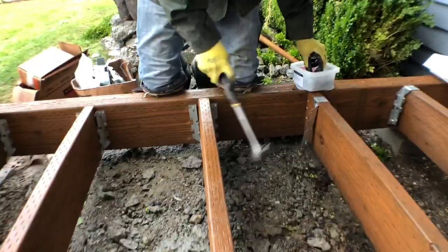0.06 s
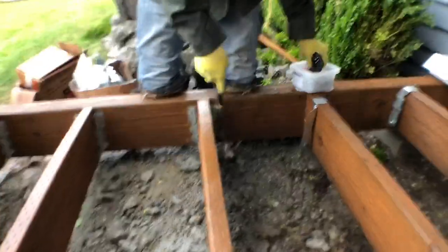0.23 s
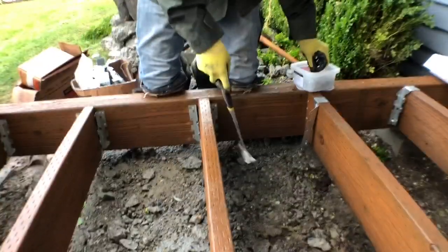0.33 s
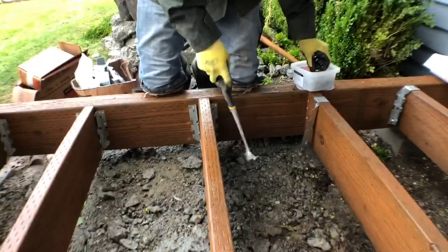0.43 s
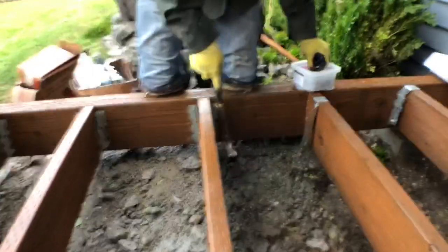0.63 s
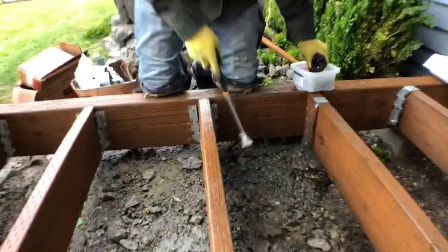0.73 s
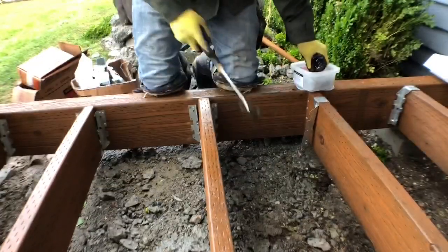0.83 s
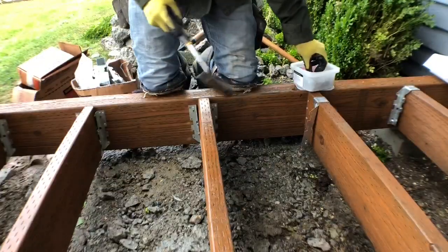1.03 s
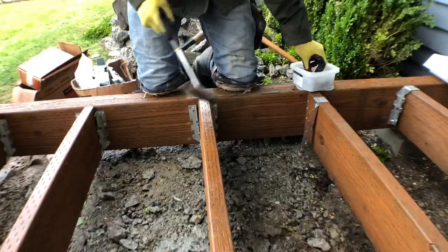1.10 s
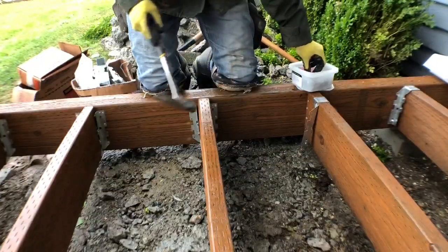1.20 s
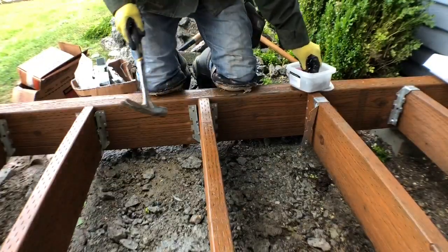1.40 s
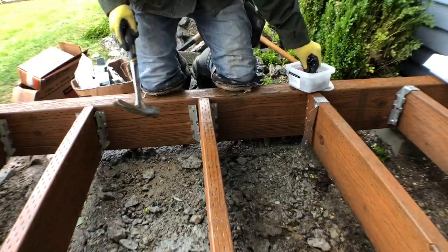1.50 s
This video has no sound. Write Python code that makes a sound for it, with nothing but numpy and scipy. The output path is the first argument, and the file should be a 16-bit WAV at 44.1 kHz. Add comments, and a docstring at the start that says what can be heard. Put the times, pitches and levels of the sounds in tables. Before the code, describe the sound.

A hammer hits a nail through a steel bracket into timber joists, outdoors and close. Soft glove rustle and tiny nail ticks open; at 0.23 s a sharp bright crack with woody resonance and brief scattered hiss; at 0.64 s a second, with fuller, duller boom and thumps. Faint low hums follow near 0.85 s, then nails tick, ping and scrape in a plastic tub from 1.13 to 1.55 s over quiet air.

```python
"""A hammer strikes a nail twice through a steel bracket into an outdoor timber frame. Each blow is a sharp crack
of shaped noise, a boom of noise-driven joist tones, and a swelling hiss that the yard sends back.
Thumps and hums follow in the joists. Loose nails in a plastic tub tick (noise bursts and hollow knocks) and
ping (beating tone pairs), gloves rustle in grains of noise and drag along the tub, over quiet noise for air."""
import sys
import numpy as np
from scipy import signal
from scipy.fft import rfft, irfft
from scipy.io import wavfile

SR = 44100
rng = np.random.default_rng(int(sys.argv[2]) if len(sys.argv) > 2 else 0)


def volts_from_db(level):
    """Convert decibel levels to linear amplitude ratios."""
    exponent = np.asarray(level, float) / 20
    return 10 ** exponent


def unload_wav(signal):
    """Save mono or channel-first audio to the path in sys.argv[1] as 16-bit WAV at rate SR, clipped to [-1, 1]."""
    wavfile.write(
        sys.argv[1],
        SR,
        np.round(np.clip(np.atleast_2d(signal).T, -1, 1) * 32767).astype(np.int16),
    )


N = 68355  # length in samples, 1.55 s

# T60 is the time a sound takes to fall by 60 dB. Spectrum tables set only the tone colour, not the loudness.

# rustle of gloves, cloth and nails: (time [s], level [dB])
RUSTLE_LEVEL = [(0, -46.5), (.07, -50.5), (.19, -60), (.225, -38.5), (.40, -49.5), (.53, -61), (.57, -56),
                (.585, -42.5), (.625, -42.5), (.75, -42.5), (.86, -54), (1.0, -59.5), (1.12, -55),
                (1.25, -51), (1.30, -41.5), (1.335, -43.5), (1.37, -47), (1.48, -49.5), (1.55, -52.5)]
# rustle spectrum: (frequency [Hz], level [dB])
RUSTLE_SPECTRUM = [(150, -75), (250, -3), (947, -3), (1150, -5), (3350, -6), (8040, -12.5), (15100, -18),
                   (16500, 2)]
GRAINS_PER_S, GRAIN_SPREAD_DB = 1600, 3.5

# outdoor hush spectrum: (frequency [Hz], level [dB])
AIR_SPECTRUM = [(15, -40), (25, 20.5), (150, -4.5), (1550, -9), (2090, -15.5), (4860, -22.5), (7920, -30),
                (11300, -23.5), (15200, -18.5), (16500, -85)]
AIR_DB = -55.5
# distant low rumble: (time [s], level [dB])
RUMBLE_LEVEL = [(0, -48.5), (.5, -51), (.6, -55.5), (.75, -48.5), (1.0, -51.5), (1.2, -49.5), (1.4, -53),
                (1.55, -54.5)]

# ticks of nails and tub: (time [s], level before the trim [dB], tub knock against the burst [dB], burst T60 [s])
TICKS = [(0.0034, -41.5, -7, 0.034), (0.0402, -37, 0.5, 0.075), (0.1101, -43, -6, 0.12),
         (0.127, -43, 2, 0.034), (0.1731, -44, 0, 0.16), (0.1969, -41, 7.5, 0.076),
         (0.4336, -41, -31, 0.026), (0.4997, -43.5, 1, 0.031), (0.5756, -39, -18, 0.046),
         (0.7745, -42, -36, 0.014), (0.7916, -39.5, -36, 0.052), (0.8311, -42, 3, 0.075),
         (0.9433, -47, 3, 0.059), (1.0271, -49, -4, 0.092), (1.1291, -35, 7.5, 0.055),
         (1.1972, -45, 5, 0.18), (1.262, -42.5, 6.5, 0.098), (1.3455, -28, -6, 0.02),
         (1.3797, -41, -21, 0.06), (1.415, -33, -27, 0.049), (1.451, -42.5, 4, 0.06),
         (1.4648, -36.5, -1.5, 0.051), (1.5424, -34.5, -1, 0.055), (0.2085, -37.5, -22, 0.16),
         (.6145, -31.5, -4, 0.0083), (1.316, -35, 2, 0.044)]
# tick spectrum: (frequency [Hz], level [dB])
TICK_SPECTRUM = [(180, -74), (300, -11.5), (1960, 4), (4500, -2.5), (7890, -9.5), (10900, -4),
                 (15700, -13.5), (16500, -53)]
TICK_TRIM_DB = -6
# hollow tones of the tub: (frequency [Hz], level [dB], T60 [s])
TUB_TONES = [(769, -7, 0.038), (888, -4.5, 0.037)]

# nails pinging: (time [s], level before the trim [dB], frequency [Hz], T60 [s])
PINGS = [(0.0034, -40.5, 10600, 0.06), (0.071, -52, 10400, 0.2), (0.119, -42.5, 10100, 0.086),
         (0.27, -42, 7620, 0.22), (0.1572, -45.5, 10130, 0.13), (0.173, -44.5, 10160, 0.097),
         (0.406, -54, 10500, 0.035), (0.4265, -48, 10480, 0.13), (0.469, -52.5, 10340, 0.065),
         (0.5006, -38, 10210, 0.066), (0.7714, -45.5, 10130, 0.044), (0.921, -50, 10600, 0.093),
         (0.9428, -47, 10250, 0.14), (1.3267, -36.5, 10400, 0.063), (1.3692, -48, 10100, 0.09),
         (1.033, -54, 10550, 0.04), (1.082, -53.5, 10760, 0.04), (0.2097, -38, 10340, 0.095),
         (.5765, -38, 10900, 0.02), (1.135, -50, 10500, 0.064), (1.346, -46, 10600, 0.032),
         (1.381, -46, 10600, 0.024), (1.415, -41.5, 9940, 0.018), (1.4655, -40, 10750, 0.021)]
PING_TRIM_DB, PING_BEAT_HZ, PING_PARTNER_DB = -5, 168, -1.5
JANGLE_DB, JANGLE_WIDTH_HZ, JANGLE_T60_S = -6, 600, 0.09

# hammer blows: (time [s], crack level [dB], boom level [dB], boom slope above 300 Hz [dB per octave],
# boost of the struck board [dB])
BLOWS = [(0.2324, -11.5, -29, 0.5, 2.5), (0.6374, -10.5, -23.5, -7.5, -19)]
# crack spectrum: (frequency [Hz], level [dB])
CRACK_SPECTRUM = [(500, -15), (1300, 4), (3800, 6), (5200, 2.5), (6200, 9), (7200, 2.5), (11200, 7.5),
                  (15200, 3), (16500, 8.5)]
CRACK_RISE_S, CRACK_HOLD_S, CRACK_T60_S = 0.00071, 0.0013, 0.011
SPIKE_LAG_S, SPIKE_DB = 0.00087, 13  # one tall sample in the noise, before it is coloured
# scattered return from boards, hedge and siding: (frequency [Hz], level [dB])
RETURN_SPECTRUM = [(710, -26), (1200, 0), (1820, -5), (2470, -8), (4240, -3.5), (15100, -5), (16000, 2),
                   (16500, -27)]
RETURN_DB = -10.5  # against the crack
RETURN_SWELL_DB, RETURN_PEAK_S, RETURN_T60_S = 8, 0.031, 0.099
RETURN_TAIL_DB, RETURN_TAIL_T60_S = -15, 0.36
BOOM_LAG_S, BOOM_RISE_S, BOOM_HOLD_S, BOOM_T60_S = 0.0021, 0.0127, 0.037, 0.11
BOOM_TAIL_DB, BOOM_TAIL_T60_S = -14, 0.69
TAIL_DARK_DB = -11.5  # per octave above 300 Hz: the lingering boom is duller
TAIL_DAMPING = 1.94  # the lingering boom comes from many boards, so its resonances blur

# what the joists ring with: (frequency [Hz], level [dB], T60 before extra damping [s])
JOIST_MODES = [(89, -18, 0.088), (112.3, -4, 0.05), (176, -20, 0.12), (245.3, -0.5, 0.068),
               (329.6, -4.5, 0.072), (383, -5.5, 0.023), (475.5, -2.5, 0.1), (533, -5.5, 0.096),
               (597, 1, 0.075), (712, -3.5, 0.057), (840, -19, 0.15), (952, -9, 0.044), (1210, -8.5, 0.054),
               (2060, -16.5, 0.032), (2680, -23, 0.061)]
BOARD_LOW_HZ, BOARD_HIGH_HZ = 560, 760  # the struck board's modes lie between these

# thumps in the joists as a blow lands, the hammer rebounds and the frame settles:
# (time [s], level [dB], slope above 300 Hz [dB per octave], click level [dB])
THUMPS = [(0.2395, -46.5, 6.5, -71), (0.2586, -49, 0.5, -67), (0.265, -43, 10, -15.5),
          (.268, -38, 10.5, -46), (0.6397, -30, -1, -21), (0.6671, -28.5, -10.5, -29)]
THUMP_BASS_DB = -2  # per octave relative to 300 Hz, on the slow modes below it
PUSH_S, CLICK_T60_S, CLICK_HZ = 0.0006, 0.027, 2200

# a far joist hums on after the second blow: (time [s], level [dB], frequency [Hz])
HUMS = [(0.844, -38, 180), (0.894, -45, 230.6)]
HUM_RISE_S, HUM_T60_S = 0.0053, 0.12

# a glove drags along the tub: (middle [s], spread [s], level [dB], frequency [Hz], width [Hz])
SCRAPES = [(1.325, 0.016, -55.5, 630, 120), (1.5, 0.016, -52.5, 5600, 1200)]

LOW_CUT_HZ, TOP_EDGE_HZ = 106, 15900
CEILING = 0.8  # the input stage rounds off the highest peaks


def evened(x):
    """Scales a sound to an average (rms) strength of 1."""
    return x / np.sqrt(np.mean(x ** 2) + 1e-20)


def add(mix, s, sound):
    """Mixes a sound in at time s."""
    part = mix[max(round(s * SR), 0):][:len(sound)]
    part += sound[:len(part)]


def coloured(x, points):
    """Filters x with the curve of a spectrum table, then evens it to rms 1."""
    hz, db = np.transpose(points)
    bins = np.fft.rfftfreq(len(x), 1 / SR)
    gain = volts_from_db(np.interp(np.log(bins + 1), np.log(hz), db))
    return evened(irfft(rfft(x) * gain, len(x)))


def resonate(x, hz, width):
    """Rings at one frequency when driven by x; a wider resonance dies sooner."""
    r = np.exp(-np.pi * width / SR)
    return 2 * signal.lfilter([1 - r], [1, -r * np.exp(2j * np.pi * hz / SR)], x).imag


def fall(t, t60):
    """Decay that starts at t = 0 and drops 60 dB in t60 seconds."""
    return volts_from_db(-60 * np.maximum(t, 0) / t60)


def level(points):
    """Turns a table of times and dB levels into a gain for every sample."""
    s, db = np.transpose(points)
    return volts_from_db(np.interp(np.arange(N) / SR, s, db))


def rustle():
    """Dense grains of noise of uneven size, each fading within about a hundredth of a second."""
    size = volts_from_db(GRAIN_SPREAD_DB * np.minimum(rng.exponential(1, N), 5))
    starts = size * (rng.random(N) < GRAINS_PER_S / SR)
    lumps = signal.oaconvolve(starts, fall(np.arange(600) / SR, 0.04))[:N]
    return level(RUSTLE_LEVEL) * coloured(lumps * rng.standard_normal(N), RUSTLE_SPECTRUM)


def air():
    """Steady outdoor hush of noise, and a low resonant rumble that comes and goes."""
    hush_noise, rumble_noise = rng.standard_normal((2, N))
    hush = volts_from_db(AIR_DB) * coloured(hush_noise, AIR_SPECTRUM)
    rumble = evened(resonate(resonate(rumble_noise, 74, 215), 93, 330))
    return hush + level(RUMBLE_LEVEL) * rumble


def tick(s, db, knock_db, t60):
    """A short bright burst of noise; the tub answers with a hollow knock of fading tones."""
    t = np.arange(6000) / SR
    knock = 0
    for hz, tone_db, ring in TUB_TONES:
        knock = knock + volts_from_db(tone_db) * fall(t, ring) * np.sin(2 * np.pi * (hz * t + rng.random()))
    burst = fall(t, t60) * coloured(rng.standard_normal(len(t)), TICK_SPECTRUM)
    onset = np.minimum(t / 0.0018, 1)
    return s, volts_from_db(db + TICK_TRIM_DB) * onset * (burst + volts_from_db(knock_db) * knock)


def ping(s, db, hz, t60):
    """A nail rings with two close tones that beat, with a brief noisy jangle against its neighbours."""
    t = np.arange(6000) / SR
    tone = np.sin(2 * np.pi * hz * t)
    partner = np.sin(2 * np.pi * ((hz + PING_BEAT_HZ) * t + rng.random()))
    tones = tone + volts_from_db(PING_PARTNER_DB) * partner
    rattle = evened(resonate(rng.standard_normal(len(t)), hz + 300, JANGLE_WIDTH_HZ))
    jangle = volts_from_db(JANGLE_DB) * fall(t, JANGLE_T60_S) * rattle
    onset = np.minimum(t / 0.00056, 1)
    return s, volts_from_db(db + PING_TRIM_DB) * onset * (fall(t, t60) * tones + jangle)


def blow(s, crack_db, boom_db, dark_db, board_db):
    """A steel crack with one spike, then the joists boom and the yard scatters a swelling hiss back."""
    lead = 0.006  # room for the crack to rise before the blow
    t = np.arange(26000) / SR - lead
    crack_noise, return_noise, boom_noise = rng.standard_normal((3, len(t)))

    crack_noise[round((lead + SPIKE_LAG_S) * SR)] = volts_from_db(SPIKE_DB)
    rise = np.exp(np.minimum(t, 0) / CRACK_RISE_S)
    crack = rise * fall(t - CRACK_HOLD_S, CRACK_T60_S) * coloured(crack_noise, CRACK_SPECTRUM)

    swell = volts_from_db(RETURN_SWELL_DB * (np.clip(t / RETURN_PEAK_S, 0, 1) - 1.5))
    fade = fall(t - RETURN_PEAK_S, RETURN_T60_S) + volts_from_db(RETURN_TAIL_DB) * fall(t, RETURN_TAIL_T60_S)
    hiss = (t > 0) * swell * fade * coloured(return_noise, RETURN_SPECTRUM)

    shake = np.clip((t - BOOM_LAG_S) / BOOM_RISE_S, 0, 1) * boom_noise
    main_shake = shake * fall(t - BOOM_HOLD_S, BOOM_T60_S)
    tail_shake = shake * volts_from_db(BOOM_TAIL_DB) * fall(t, BOOM_TAIL_T60_S)
    boom = joists(main_shake, dark_db, board_db=board_db, even=True)
    boom = boom + joists(tail_shake, dark_db + TAIL_DARK_DB, damping=TAIL_DAMPING, even=True)
    return s - lead, volts_from_db(crack_db) * (crack + volts_from_db(RETURN_DB) * hiss) + volts_from_db(boom_db) * boom


def joists(shake, dark_db, bass_db=0, board_db=0, damping=1, even=False):
    """Every mode of the frame answers the shaking; with even, long shaking feeds each its full share."""
    out = 0
    for hz, db, t60 in JOIST_MODES:
        octaves = np.log2(hz / 300)
        ring = resonate(shake, hz, 2.1 * damping / t60) * np.sqrt(t60 * SR / 14)
        if even:
            ring = ring * np.linalg.norm(shake) / np.linalg.norm(ring) / np.sqrt(2)
        slope_db = dark_db * max(octaves, 0) + bass_db * min(octaves, 0)
        boost_db = board_db * (BOARD_LOW_HZ < hz < BOARD_HIGH_HZ)
        out = out + volts_from_db(db + slope_db + boost_db) * ring
    return out


def thump(s, db, dark_db, click_db):
    """One short smooth push sets the joists ringing, with a dull click of low-passed noise."""
    t = np.arange(12000) / SR
    ramp = np.minimum(t / PUSH_S, 1)
    push = np.sqrt(SR / 30) * np.sin(np.pi * ramp) ** 2 / (PUSH_S * SR / 2)
    dull = signal.lfilter(*signal.butter(2, CLICK_HZ, fs=SR), rng.standard_normal(len(t)))
    click = ramp * fall(t, CLICK_T60_S) * evened(dull)
    return s, volts_from_db(db) * joists(push, dark_db, THUMP_BASS_DB) + volts_from_db(click_db) * click


def hum(s, db, hz):
    """A soft low tone that swells and dies."""
    t = np.arange(12000) / SR
    swell = np.minimum(t / HUM_RISE_S, 1) * fall(t - HUM_RISE_S, HUM_T60_S)
    return s, volts_from_db(db) * swell * np.sin(2 * np.pi * hz * t)


def scrape(s, spread, db, hz, width):
    """Stuttering friction noise coloured by the tub's resonance, swelling and fading."""
    swell = np.exp(-0.5 * ((np.arange(N) / SR - s) / spread) ** 2)
    friction, wobble = rng.standard_normal((2, N))
    stutter = volts_from_db(4.6 * evened(resonate(wobble, 32, 68)))
    return volts_from_db(db) * swell * evened(resonate(friction * stutter, hz, width))


def scene():
    """Adds all sources together, as heard by one microphone."""
    mix = rustle() + air() + sum(scrape(*row) for row in SCRAPES)
    for source, rows in ((blow, BLOWS), (thump, THUMPS), (hum, HUMS), (tick, TICKS), (ping, PINGS)):
        for row in rows:
            add(mix, *source(*row))
    return mix[None]


def roll_off(x):
    """The treble ends steeply here."""
    return signal.sosfilt(signal.butter(12, 17000, fs=SR, output="sos"), x)


def record(dry):
    """Soft overload rounds the peaks, then the microphone's low cut and a steep treble limit follow."""
    rounded = CEILING * np.tanh(dry / CEILING)
    low_cut = signal.butter(2, LOW_CUT_HZ, "high", fs=SR, output="sos")
    thinned = signal.sosfilt(low_cut, rounded)
    top_edge = signal.firwin(255, TOP_EDGE_HZ, window=("kaiser", 7), fs=SR)
    finished = signal.oaconvolve(thinned, top_edge[None], "same")
    return roll_off(finished)


dry = scene()
out = record(dry)
unload_wav(out)
```